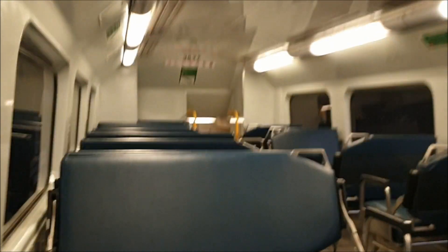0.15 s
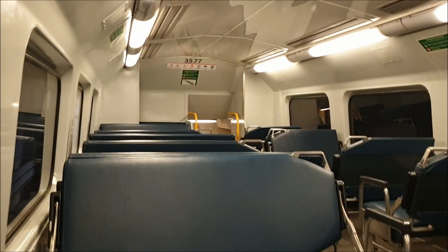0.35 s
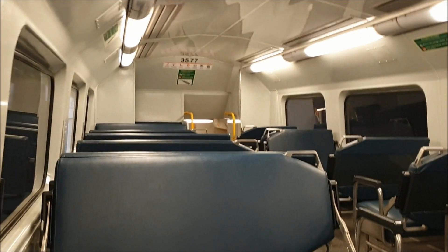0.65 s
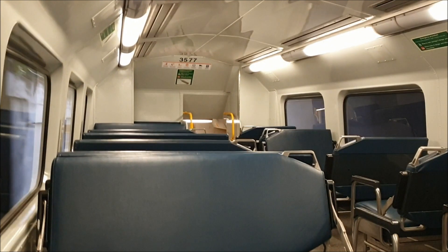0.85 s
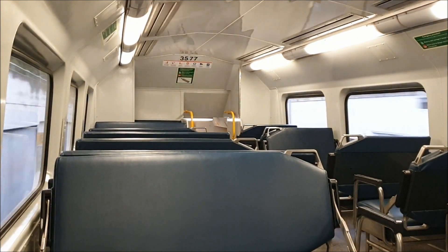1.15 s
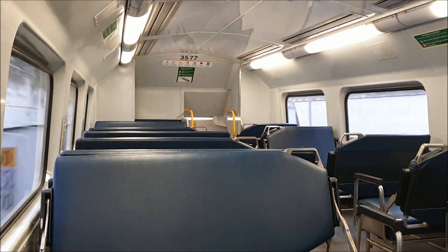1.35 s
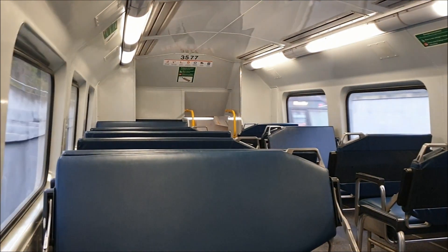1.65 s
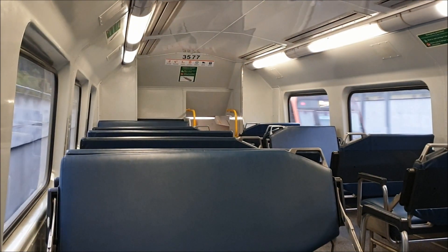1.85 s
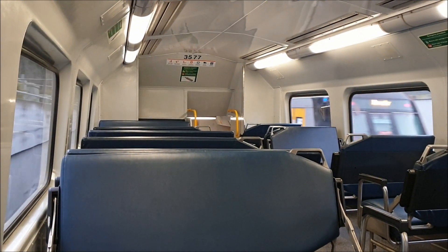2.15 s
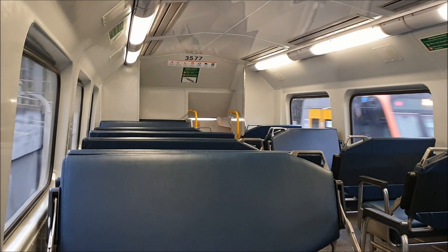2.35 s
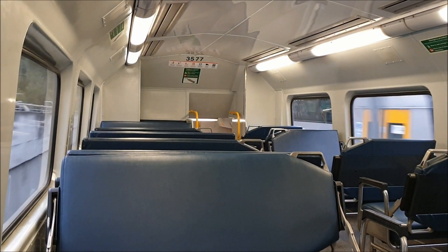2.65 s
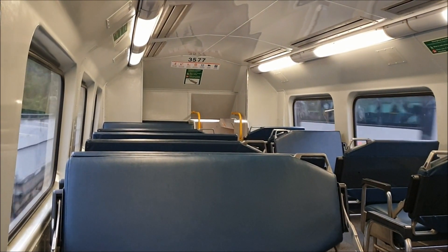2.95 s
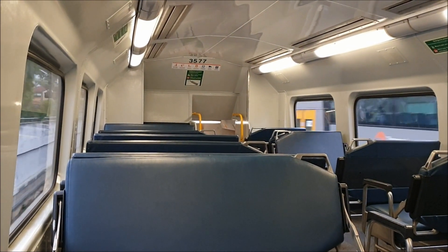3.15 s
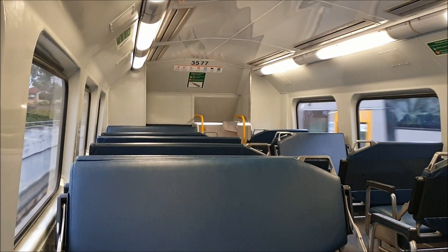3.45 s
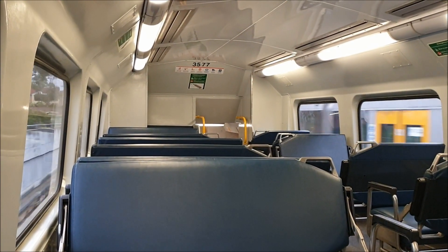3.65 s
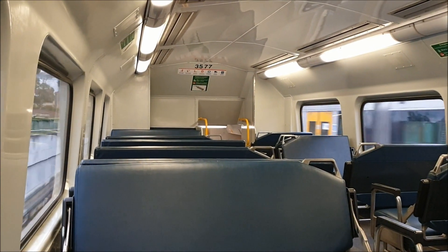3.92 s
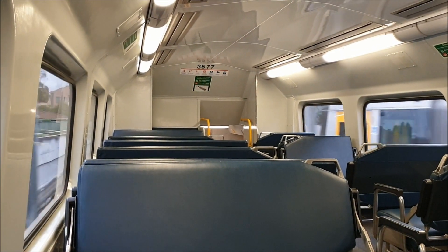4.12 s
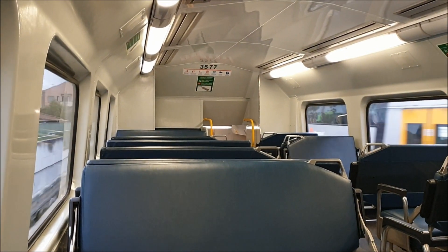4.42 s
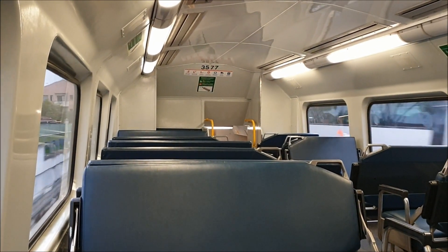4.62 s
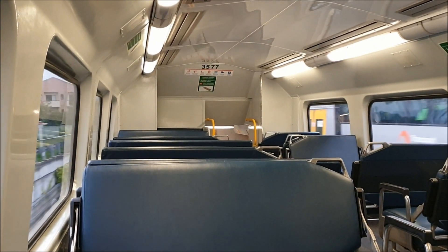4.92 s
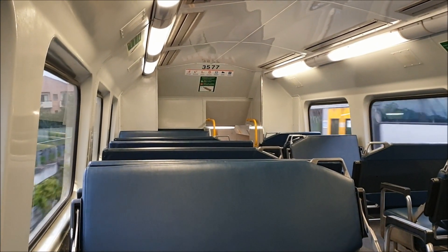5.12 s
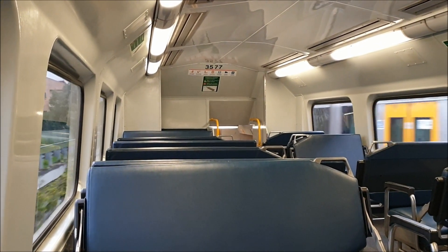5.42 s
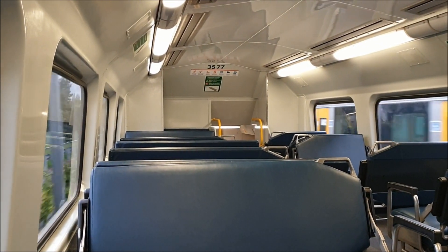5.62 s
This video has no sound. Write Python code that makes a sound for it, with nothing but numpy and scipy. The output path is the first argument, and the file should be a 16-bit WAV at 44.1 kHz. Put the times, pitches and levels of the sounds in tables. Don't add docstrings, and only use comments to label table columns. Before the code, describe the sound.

Heavy, muffled wheel rumble dominates a running train carriage, heard by closely spaced small stereo microphones among the seats. A constant low hum dips now and then, with a faint motor whine and soft air rush above. A light hissing brush passes near one second; in the second half, brief tiny squeaks and scrapes appear on a curve.

```python
import sys
import numpy as np
from scipy import signal
from scipy.fft import rfft, irfft, next_fast_len
from scipy.io import wavfile
from scipy.ndimage import uniform_filter1d, map_coordinates

SR = 44100
rng = np.random.default_rng(int(sys.argv[2]) if len(sys.argv) > 2 else 0)


def unload_audio(sound):
    columns = np.transpose(np.atleast_2d(sound))
    steps = np.round(np.clip(columns, -1, 1) * 32767)
    wavfile.write(sys.argv[1], SR, steps.astype(np.int16))


def volts_from_decibels(level):
    exponent = np.asarray(level, float) / 20
    return 10 ** exponent


N = 254898

# freq_hz, density_db
BOUNCE_SPECTRUM = [(15, -40), (25, -16), (32, -11.5), (42, 0.5), (55, 3), (68, 5), (85, 2.5), (105, -3),
                   (130, -48.5)]
# freq_hz, density_db
BOOM_SPECTRUM = [(70, -26), (95, 7.5), (125, 14), (150, 9.5), (190, 1), (230, -41)]
# freq_hz, density_db
ROAR_SPECTRUM = [(110, -32), (180, -4.5), (195, -12), (259, -11), (426, -14.5), (565, -20), (681, -19.5),
                 (725, -22.5), (792, -18), (946, -21.5), (1070, -23), (1150, -29.5), (1500, -31.5),
                 (1950, -43), (3300, -120)]
# freq_hz, density_db
RUSH_SPECTRUM = [(700, -25), (1200, -2), (1550, -5), (1700, -3), (2330, -2.5), (2800, -5), (3900, -8.5),
                 (4700, -8), (5600, -10.5), (6800, -24), (8500, -29), (10000, -120)]
# freq_hz, left_right_likeness
PORT_LIKENESS = [(60, .99), (180, 0.97), (250, 0.82), (450, 0.62), (530, 0.61), (800, 0.2), (1100, 0.007),
                 (1600, -0.31), (2300, 0.092), (4200, -0.064), (5800, 0.37), (8000, 0.17), (10000, .2),
                 (12000, 0.21), (15000, 0.22)]
# time_s, gain_db
WALL_GAIN = [(0, 1.04), (1.3, 1.65), (2.0, -0.4), (3.9, -0.13), (4.4, 0.3), (5.78, -0.3)]
# centre_s, level_db, half_length_s
TRACK_DIPS = [(.07, -25.5, .03), (.3, -25.5, .08), (.65, -30, .1), (1.0, -26, 0.046), (1.26, -28.5, 0.048),
              (1.62, -27, 0.047), (1.85, -23, 0.022), (2.25, -28.5, .06), (3.12, -29.5, 0.15),
              (3.45, -28, 0.065), (3.9, -36, 0.2), (4.33, -28.5, 0.22), (4.75, -24.5, 0.12),
              (5.2, -32, 0.36), (5.7, -29.5, 0.11)]
# centre_s, level_db
RAIL_JOINTS = [(.03, -25.5), (.35, -22), (.8, -29), (1.0, -31), (1.4, -40), (1.64, -33), (1.85, -34),
               (2.1, -37), (2.54, -28), (3.11, -28), (3.69, -25.5), (4.33, -28), (4.57, -40), (5.2, -41),
               (5.5, -34), (5.76, -31)]
# centre_s, depth_db
FAN_FADES = [(.09, 13.5), (.46, 9), (.71, 2.5), (1.17, 2.5), (1.43, 4), (2.05, 3), (2.42, 14), (2.6, 4.5),
             (2.75, 2.5), (2.9, 3.5), (3.05, 11.5), (3.52, 3.5), (3.86, 5), (4.29, 6), (5.49, 7),
             (5.78, 18)]
# time_s, main_order_db
MOTOR_LOAD = [(0, -50), (.25, -45), (.5, -45.5), (1.0, -45.5), (1.4, -41.5), (1.7, -53), (2.5, -55),
              (3.2, -46), (3.45, -55), (4.1, -57), (4.3, -44), (4.78, -43), (4.95, -46), (5.4, -55),
              (5.78, -52)]
# shaft_multiple, level_re_main_pair_db
WEAK_ORDERS = [(11, -11), (12, -12.5), (16, -2.5), (20, -9.5)]
# freq_hz, level_db
AUXILIARY_TONES = [(308.5, -45), (1195.5, -53.5)]
# time_s, scrape_db
FLANGE_PRESSURE = [(0, -57), (.1, -50.5), (.4, -53), (.5, -53.5), (.95, -53), (1.18, -48), (1.45, -50.5),
                   (1.7, -54), (3.19, -54.5), (3.22, -51.5), (3.6, -50), (3.98, -53), (4.15, -49.5),
                   (4.4, -52.5), (4.65, -49.5), (4.88, -55), (5.1, -53), (5.78, -52.5)]
# freq_hz, density_db
GRIT_SPECTRUM = [(4000, -50), (5500, 3), (6500, 7.5), (8000, 2), (10000, 2), (11500, -0.5), (12500, -20),
                 (13500, -120)]
# freq_hz, density_db
SIZZLE_SPECTRUM = [(8000, -40), (10000, -6), (11500, 0), (12500, -3.5), (13500, -8), (15000, -12.5),
                   (15700, -14), (16500, -120)]
# centre_s, level_db, half_length_s
FLANGE_BITES = [
    (.38, -55, .06),
    (4.05, -56, .1),
    (4.62, -60, .1),
    (5.06, -51.5, 0.041),
    (5.2, -55, .1),
    (5.72, -56, 0.065),
]
# centre_s, level_db, half_length_s
CURVE_CONTACT = [
    (3.21, -54, .4),
]
# centre_s, half_length_s, level_db
LIGHT_BRUSHES = [
    (.36, .12, -55),
    (1.187, 0.093, -43),
]
# freq_hz, half_width_hz, level_db
BRUSH_RESONANCES = [(5750, 700, 5), (11150, 800, 0)]
# freq_hz, width_hz, skirt_db
RIM_MODES = [(9510, 150, -6), (11110, 140, -6), (12730, 170, -10), (14200, 200, -9)]
# centre_s, level_db, half_length_s
RIM_SQUEALS = [
    [(3.5, -51, .1), (3.75, -51.5, 0.24), (4.2, -55, 0.17), (4.52, -55, .1), (5.1, -62, .1)],
    [(3.45, -60, .1), (3.82, -52, 0.14), (4.17, -43.5, .1), (4.58, -46.5, 0.2), (5.05, -44.5, 0.11),
     (5.33, -52, .13)],
    [(4.18, -65, .12), (5.12, -49, .06), (5.3, -53, .12)],
    [(4.15, -63, .1), (4.75, -62, .1), (5.1, -55, 0.11)],
]
# freq_hz, left_minus_right_db
CASING_LEAN = [(60, 1.2), (220, 3), (370, -1.5), (650, 3.5), (1000, 0.5), (1250, 1), (2500, -0.5),
               (4600, -6.5), (6600, 2), (8200, -5), (10000, -3), (15000, -3)]
# start_s, end_s
WIDE_SPELLS = [(0.0, .034), (.238, .306), (.448, .719), (.948, 1.178), (1.627, 1.694), (1.891, 1.964),
               (2.07, 2.421), (2.498, 2.854), (3.098, 3.325), (3.858, 3.995), (4.071, 4.14), (4.294, 4.478),
               (4.75, 5.48), (5.525, 5.668)]
# freq_hz, survival_chance
SIDE_SURVIVAL = [(4600, 1), (5100, .55), (5500, .25), (7200, .3), (8000, .75), (9000, .4), (10000, .15),
                 (12500, .06), (15000, .03)]


def unit(x):
    return x / np.sqrt(np.mean(x ** 2) + 1e-20)


def along(points, hz):
    f, v = np.transpose(points)
    return np.interp(np.log(hz + 1), np.log(f + 1), v)


def curve(rows):
    s, value = np.transpose(rows)
    return np.interp(np.arange(N) / SR, s, value, left=-120, right=-120)


def wobble(rate_hz):
    s = np.arange(0, N / SR + .002, .002)
    knots = rng.standard_normal(int(N * rate_hz / SR) + 4)
    return np.interp(np.arange(N) / SR, s, map_coordinates(knots, [s * rate_hz]))


def swells(rows, rise=1, fall=1):
    t = np.arange(0, N / SR + .002, .002)
    power = 0
    for s, db, half_s in rows:
        reach_s = half_s * np.where(t < s, rise, fall)
        power = power + (volts_from_decibels(db) * np.exp(-((t - s) / reach_s) ** 2 / 2)) ** 2
    return np.interp(np.arange(N) / SR, t, np.sqrt(power))


def filtered(x, response):
    m = next_fast_len(N + SR // 4)
    return irfft(rfft(x, m) * response(np.fft.rfftfreq(m, 1 / SR)), m)[..., :N]


def diffuse(gain, patchy_db):
    z = signal.stft(rng.standard_normal((2, N)), nperseg=512)[2]
    field = uniform_filter1d(rng.standard_normal(z.shape[1:]), size=6, axis=0)
    field = uniform_filter1d(field, size=14, axis=1)
    pair = signal.istft(z * volts_from_decibels(patchy_db * unit(field)), nperseg=512)[1][:, :N]

    def mid_side_gain(hz):
        likeness = np.clip(along(PORT_LIKENESS, hz), -.9, 1)
        return gain(hz) * [hz * 0 + 1, np.tan(np.arccos(likeness) / 2)]

    mid, side = filtered(pair, mid_side_gain)
    return np.array([mid + side, mid - side]) / np.std(mid)


def spectral(points, patchy_db):
    return diffuse(lambda hz: volts_from_decibels(along(points, hz)), patchy_db)


def evened(x, share):
    envelope = np.sqrt(np.abs(uniform_filter1d(np.mean(x, axis=0) ** 2, size=SR // 12)) + 1e-4)
    x = x / envelope ** np.clip(share, 0, 1)
    return x / np.std(np.mean(x, axis=0))


def tone(hz, drift_hz, flutter_db, spread_rad):
    phase = 2 * np.pi * np.cumsum(hz + drift_hz * wobble(5)) / SR + rng.uniform(0, 2 * np.pi)
    lead = spread_rad * wobble(1.0)
    return np.sqrt(2) * volts_from_decibels(flutter_db * wobble(6)) * np.sin([phase + lead, phase - lead])


def rolling():
    walls_db = curve(WALL_GAIN)
    heave = swells(TRACK_DIPS)
    joint_rise_s, joint_fall_s = 0.033, 0.073
    drum = swells([(s, db, 1) for s, db in RAIL_JOINTS], joint_rise_s, joint_fall_s)
    bounce_gain = np.hypot(volts_from_decibels(-28.5), heave)
    boom_gain = np.hypot(volts_from_decibels(-31.5), drum)
    roar_gain = volts_from_decibels(-31 + 1.25 * walls_db + 0.63 * wobble(9)) + 0.034 * (heave + drum)
    rush_gain = volts_from_decibels(-36 + walls_db + 0.14 * wobble(8))
    bounce = bounce_gain * evened(spectral(BOUNCE_SPECTRUM, patchy_db=0.15), share=0.85)
    boom = boom_gain * evened(spectral(BOOM_SPECTRUM, patchy_db=0.18), share=0.39)
    roar = roar_gain * evened(spectral(ROAR_SPECTRUM, patchy_db=0.83), share=1.0)
    rush = rush_gain * evened(spectral(RUSH_SPECTRUM, patchy_db=0.6), share=0.33)
    bending_hz, long_dip_s, long_dip_db, half_length_s = 66.1, 0.18, -24, 0.1
    bending_gain = swells([(long_dip_s, long_dip_db, half_length_s)]) + volts_from_decibels(-11) * heave
    bending = bending_gain * tone(bending_hz, drift_hz=2.99, flutter_db=2.0, spread_rad=.03)
    return bounce + boom + roar + rush + bending


def fan():
    blade_hz, level_db, fade_s = 167.85, -26, 0.063
    t = np.arange(N) / SR
    fade_db = sum(depth * np.exp(-((t - s) / fade_s) ** 2 / 2) for s, depth in FAN_FADES)
    return volts_from_decibels(level_db - fade_db) * tone(blade_hz, drift_hz=0.32, flutter_db=0.6, spread_rad=0.05)


def motor():
    mean_shaft_hz, slowing_hz_per_s = 54.68, 0.0591
    t = np.arange(N) / SR
    shaft_hz = mean_shaft_hz - slowing_hz_per_s * (t - t.mean())
    load_db = curve(MOTOR_LOAD)
    upper_db = -49.0 + 0.66 * (load_db - load_db.mean())
    main = 0
    for order, db in ((14, load_db), (15, upper_db)):
        main = main + volts_from_decibels(db - 1.5) * tone(order * shaft_hz, drift_hz=0.4, flutter_db=0.8, spread_rad=.2)
    weak = 0
    for order, db in WEAK_ORDERS:
        weak = weak + volts_from_decibels(db) * tone(order * shaft_hz, drift_hz=1.583, flutter_db=3, spread_rad=0.49)
    return main + volts_from_decibels((load_db + upper_db) / 2) * weak


def auxiliaries():
    return sum(volts_from_decibels(db) * tone(hz, drift_hz=1.23, flutter_db=2.0, spread_rad=0.17)
               for hz, db in AUXILIARY_TONES)


def flange_scrape():
    scrape_db = curve(FLANGE_PRESSURE)
    swing_db = scrape_db - scrape_db.mean()
    bites = np.hypot(swells(FLANGE_BITES, rise=.4), swells(CURVE_CONTACT, rise=.03))
    grip_db = 1.5 * wobble(13) * volts_from_decibels(-.6 * swing_db)
    sizzle_db = -59 + 1.4 * swing_db + .6 * wobble(11) + grip_db
    grit_gain = np.hypot(volts_from_decibels(scrape_db + grip_db), 0.98 * bites)
    sizzle_gain = np.hypot(volts_from_decibels(sizzle_db), bites)
    grit = grit_gain * volts_from_decibels(3) * spectral(GRIT_SPECTRUM, patchy_db=0.0)
    sizzle = sizzle_gain * volts_from_decibels(1.5) * spectral(SIZZLE_SPECTRUM, patchy_db=0.0)
    return grit + sizzle


def flange_brushes():
    t = np.arange(N) / SR

    def humps(hz):
        return sum(volts_from_decibels(db) / (1 + ((hz - centre) / half) ** 2) for centre, half, db in BRUSH_RESONANCES)

    gain = sum(volts_from_decibels(db) * np.exp(-((t - s) / half_s) ** 2 / 2) for s, half_s, db in LIGHT_BRUSHES)
    return gain * diffuse(humps, patchy_db=.6)


def flange_squeal():
    sound = 0
    for spells, (centre_hz, width_hz, skirt_db) in zip(RIM_SQUEALS, RIM_MODES):
        def mode(hz):
            peak = 1 / (1 + (2 * (hz - centre_hz) / width_hz) ** 2)
            shoulder = volts_from_decibels(skirt_db) / (1 + ((hz - centre_hz) / 450) ** 2)
            return peak + shoulder

        gain = swells(spells) * volts_from_decibels(1.2 * wobble(40) - 1.1)
        sound = sound + gain * evened(diffuse(mode, patchy_db=0.5), share=.3)
    return sound


def scene():
    return rolling() + fan() + motor() + auxiliaries() + flange_scrape() + flange_brushes() + flange_squeal()


def casing(pair):
    return filtered(pair, lambda hz: volts_from_decibels(along(CASING_LEAN, hz) * [[.5], [-.5]]))


def thinned(pair):
    edge_hz, edge_swing_hz, thinning_hz, lapse_chance = 15350, 360, 3300, .1
    left, right = pair
    hz, t, z = signal.stft(np.array([left + right, left - right]) / 2, SR, nperseg=2048)
    edge = edge_hz + edge_swing_hz * wobble(30)[np.minimum(t * SR, N - 1).astype(int)]
    thinning = np.clip((hz[:, None] - edge + thinning_hz) / thinning_hz, 0, 1) ** 2
    chance = uniform_filter1d(rng.random(z.shape[1:]), size=3, axis=0)
    kept = (hz[:, None] < edge) & (chance > .56 * thinning)
    in_spell = sum((t >= start) & (t <= end) for start, end in WIDE_SPELLS)
    wide = in_spell * (rng.random(len(t)) > lapse_chance) > 0
    luck = np.repeat(rng.random((65, len(t) // 2 + 1)), 16, axis=0)
    luck = np.repeat(luck, 2, axis=1)[:len(hz), :len(t)]
    side_kept = wide | (luck < along(SIDE_SURVIVAL, hz)[:, None])
    z = z * kept * [np.ones(kept.shape), side_kept]
    mid, side = signal.istft(z, SR, nperseg=2048)[1][:, :N]
    return np.array([mid + side, mid - side])


def top_cut(x):
    return signal.sosfilt(signal.butter(12, 15630, fs=SR, output="sos"), x)


def record(dry):
    mix = thinned(casing(dry))
    return top_cut(mix)


dry = scene()
out = record(dry)
unload_audio(out)
```